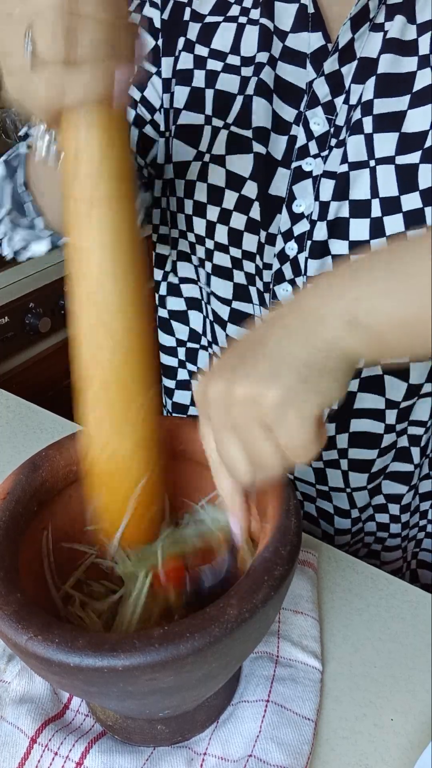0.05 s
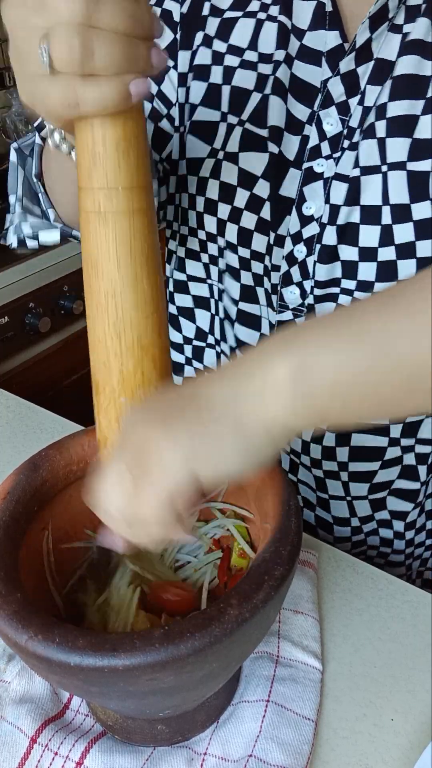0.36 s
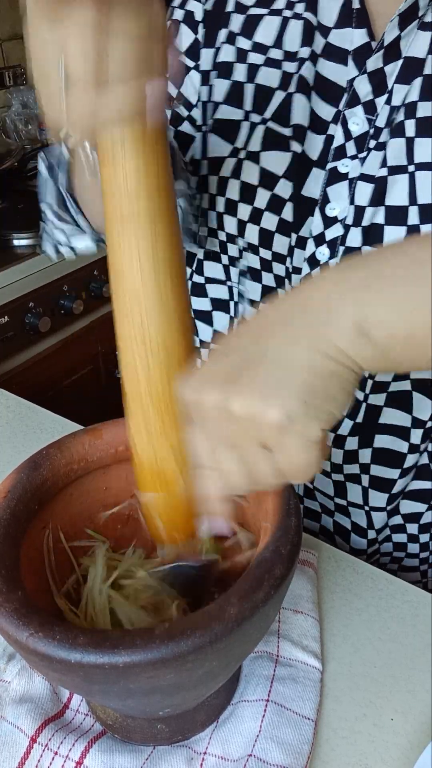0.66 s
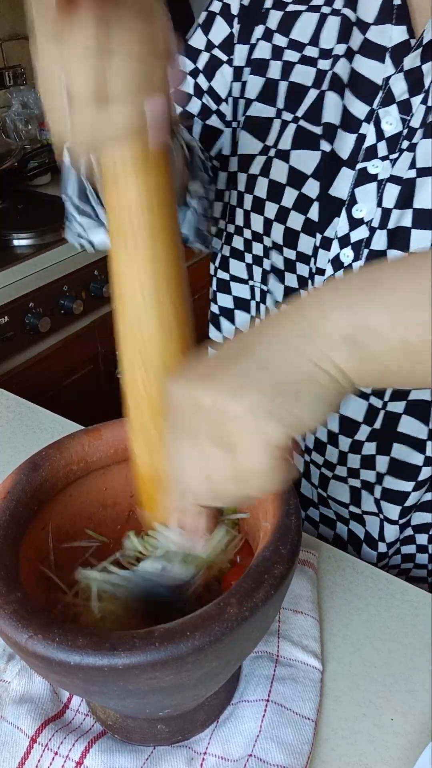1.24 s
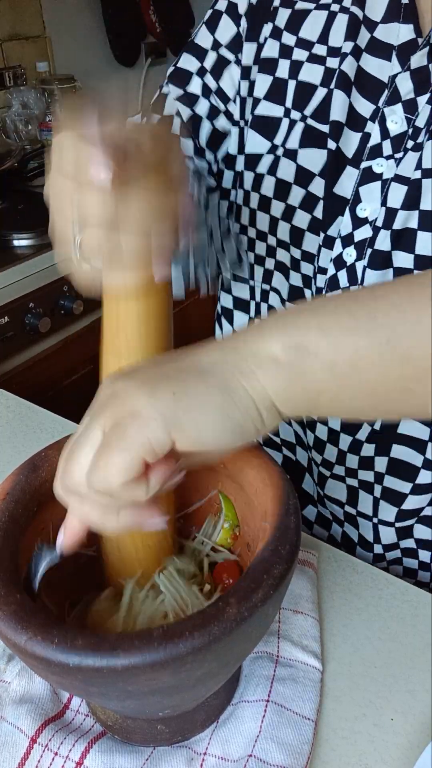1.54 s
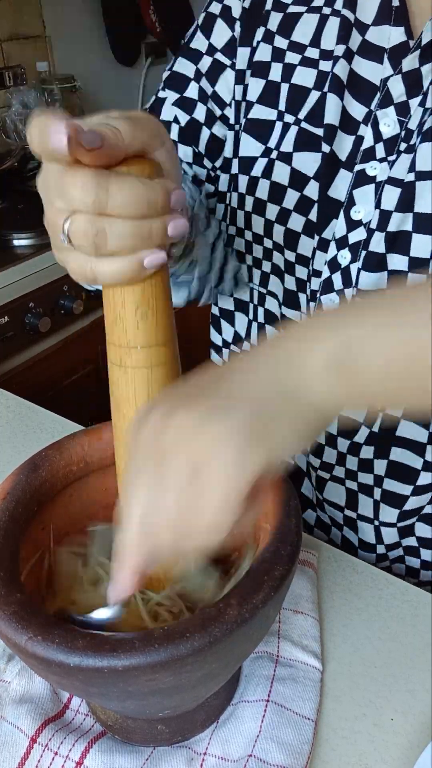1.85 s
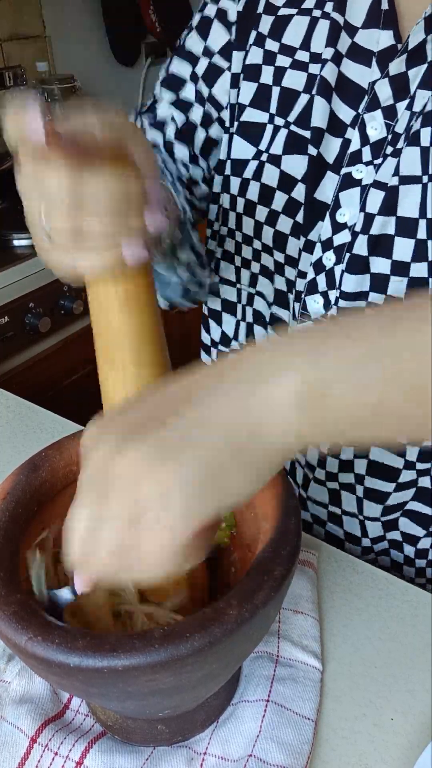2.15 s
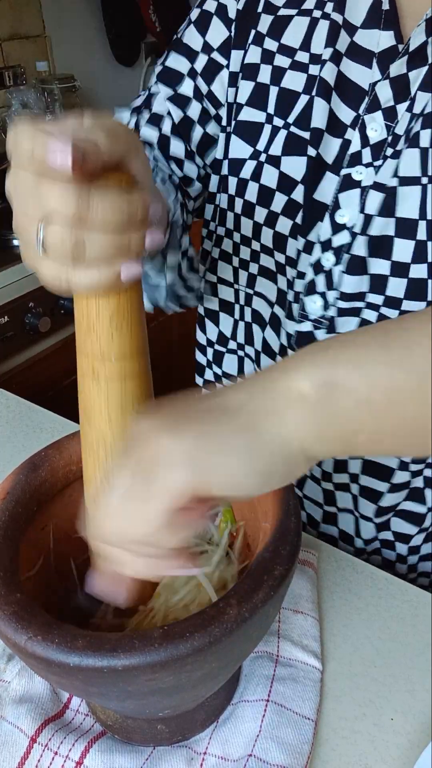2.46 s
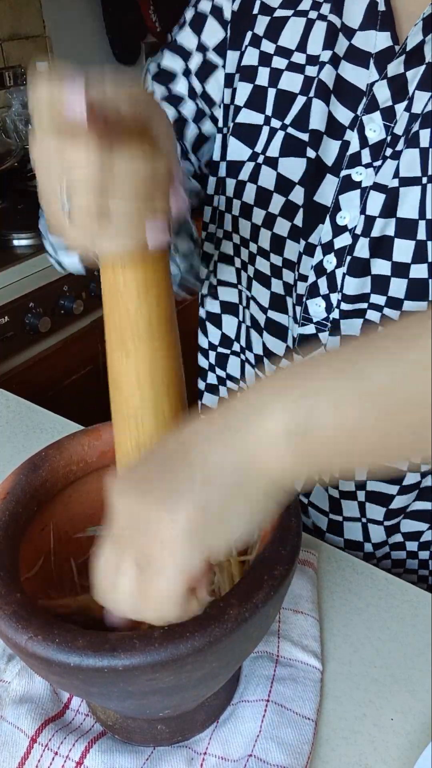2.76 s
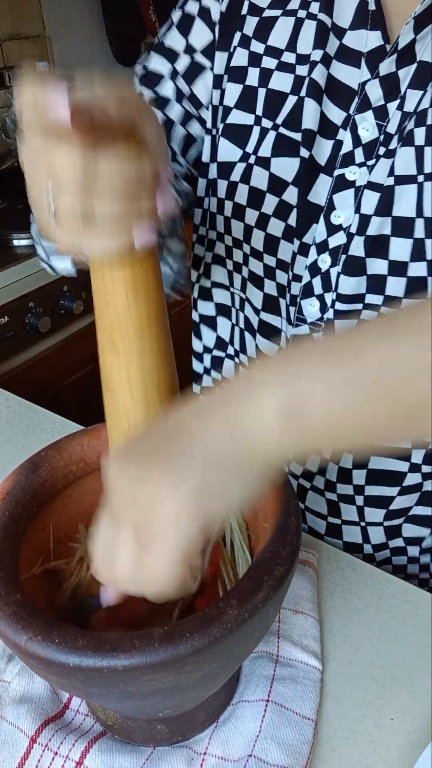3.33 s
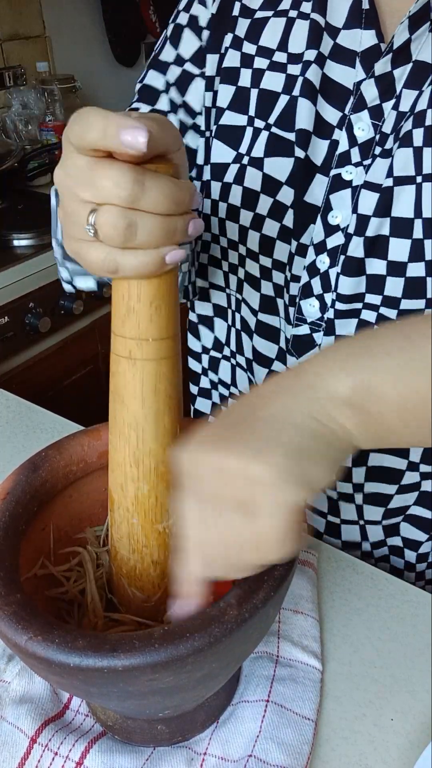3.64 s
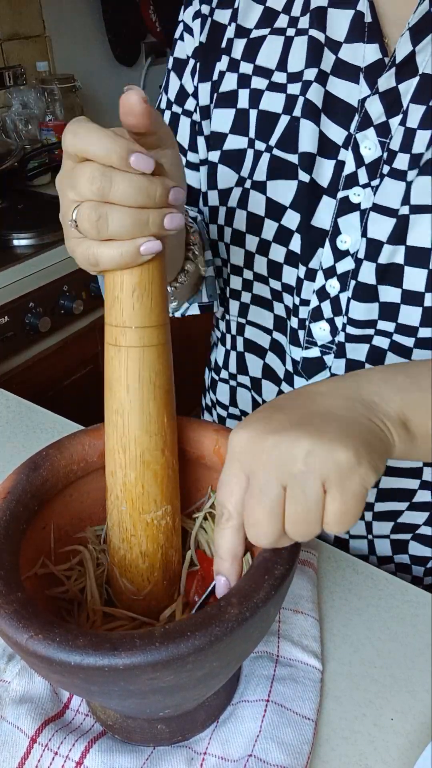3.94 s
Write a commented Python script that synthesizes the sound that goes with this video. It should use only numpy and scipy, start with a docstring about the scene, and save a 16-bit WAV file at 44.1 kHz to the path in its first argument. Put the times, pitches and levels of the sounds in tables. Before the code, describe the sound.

Close up in a small kitchen, a pestle knocks rhythmically in a clay mortar, thumping the table and squishing wet food. A metal spoon ticks and scrapes between the strokes, until the work stops near the end.

```python
"""Pestle and clay mortar

Close up in a small kitchen, on a stereo pair of microphones. A wooden pestle pounds shredded vegetables
about 3.5 times a second; each blow knocks and rings the clay, thumps the table and squeezes the wet food.
Between blows a metal spoon clinks on the wall and scrapes the food back with short squeaks."""
import sys
import numpy as np
from scipy import signal
from scipy.fft import rfft, irfft
from scipy.io import wavfile
from scipy.ndimage import uniform_filter1d, map_coordinates

SR = 44100
rng = np.random.default_rng(int(sys.argv[2]) if len(sys.argv) > 2 else 0)


def persist_wave(psi):
    """Save psi, clipped to +-1, as 16-bit WAV."""
    counts = np.round(np.clip(psi, -1, 1) * 32767).astype(np.int16)
    wavfile.write(sys.argv[1], SR, np.atleast_2d(counts).T)


N = 176400
T = np.arange(SR // 2) / SR  # time axis of one short sound
WORK_ENDS_S, CHATTER_S, POPS_PER_S = 3.58, 0.005, 2100
CLACK_DECAY_S, CLACK_SNAP = 0.0046, 11.9


def amp(db):
    """Decibels to gain."""
    return 10 ** (np.asarray(db) / 20)


def unit(x):
    """Scales to an rms of 1."""
    return x / np.sqrt(np.mean(x ** 2) + 1e-20)


def hit_unit(x):
    """Scales so that the first 10 ms have an rms of 1."""
    return x / np.sqrt(np.mean(x[..., :SR // 100] ** 2) + 1e-20)


def read(points, hz):
    """Reads a table on a log-frequency axis."""
    freqs, values = np.transpose(points)
    return np.interp(np.log(hz + 1), np.log(freqs), values)


def add(mix, start_s, sound):
    """Mixes a sound in at start_s."""
    at = round(start_s * SR)
    sound = sound[..., max(-at, 0):]
    part = mix[..., max(at, 0):][..., :sound.shape[-1]]
    part += sound[..., :part.shape[-1]]


def colour(x, spectrum, tilt_db=0):
    """Causal filter with the given spectrum, tilted by tilt_db per octave from 300 to 4000 Hz."""
    hz = abs(np.fft.fftfreq(2048, 1 / SR))
    octaves = np.log2(np.clip(hz, 300, 4000) / 1000)
    log_gain = np.log(amp(read(spectrum, hz) + tilt_db * octaves))
    minimum_phase = np.exp(np.conj(signal.hilbert(log_gain)))
    return signal.fftconvolve(x, np.fft.ifft(minimum_phase).real)[:len(x)]


def band(x, lo_hz, hi_hz):
    """Band-pass filter."""
    return signal.sosfilt(signal.butter(2, [lo_hz, hi_hz], "band", fs=SR, output="sos"), x)


def mode(hz, db, t60, phase=0):
    """One dying sine."""
    return amp(db - 60 * T / t60) * np.sin(2 * np.pi * hz * T + phase)


def burst(decay_s, snap):
    """A sharp contact followed by its dense scatter inside the bowl."""
    x = rng.standard_normal(len(T)) * np.exp(-T / decay_s)
    x[0] += snap
    return x


def grains(size, per_s):
    """Random clicks of uneven strength."""
    signs = rng.choice([-1, 1], size)
    strength_db = 3 * np.minimum(rng.exponential(1, size), 5)
    return unit(signs * amp(strength_db) * (rng.random(size) < per_s / SR))


def drift(size, over_s):
    """A random wander with an rms of 1, changing over about over_s."""
    width = round(over_s * SR)
    smooth = uniform_filter1d(rng.standard_normal(size), width, mode="wrap")
    return unit(uniform_filter1d(smooth, width // 2 + 1, mode="wrap"))


def scatter(x):
    """The curved bowl sends a different cluster of quick reflections to each microphone."""
    reflections = rng.standard_normal((2, len(T))) * np.exp(-T / 0.0028)
    paths = amp(2.5) * unit(reflections) / np.sqrt(len(T))
    paths[:, 0] += 1
    return signal.fftconvolve(x[None], paths, axes=1)[:, :len(x)]


# The small kitchen's reverberation: freq_hz, t60_s
KITCHEN_DECAY = [(60, 0.54), (200, 0.32), (600, 0.17), (1200, 0.47), (3200, 0.27), (8000, 0.3),
                 (15000, 0.26)]
# Surfaces near the mortar: delay_s, left_gain, right_gain
NEAR_ECHOES = [(.0031, 0.48, 0.1), (.0074, 0.13, 0.2), (0.0132, 0.14, 0.2)]
def room(x, wet_db, echo_db, correlation=0, left_lag_s=0.00088):
    """Direct sound reaches the right microphone first; near echoes and a diffuse tail follow."""
    hz, t, noise = signal.stft(rng.standard_normal((2, len(T))), SR, nperseg=256)
    decay = amp(-60 * t / read(KITCHEN_DECAY, hz)[:, None])
    tail = signal.istft(noise * decay, SR, nperseg=256)[1][:, :len(T)]
    tail *= np.minimum(T / 0.0067, 1)
    tail[1] = correlation * tail[0] + np.sqrt(1 - correlation ** 2) * tail[1]
    response = amp(wet_db) * tail / np.linalg.norm(tail[0])
    response[0, round(left_lag_s * SR)] += 1
    response[1, 0] += 1
    for delay_s, left, right in NEAR_ECHOES:
        response[:, round(delay_s * SR)] += amp(echo_db) * np.array([left, right])
    return signal.fftconvolve(np.atleast_2d(x), response, axes=1)[:, :N]


# The still kitchen all around: freq_hz, level_db
ROOM_TONE_SPECTRUM = [(20, 4.5), (50, -7.5), (400, -25.5), (11000, -32.5)]
def room_tone():
    """Faint, low noise, different at each microphone."""
    return amp(-67.5) * np.array([unit(colour(x, ROOM_TONE_SPECTRUM)) for x in rng.standard_normal((2, N))])


# The rocking table, alike in both microphones: freq_hz, level_db
RUMBLE_SPECTRUM = [(22, -45), (45, -1), (60, 2), (110, -11), (180, -24), (500, -57.5)]
def table_rumble():
    """The table rocks with a low rumble as long as the work lasts, then settles."""
    after_s = np.maximum(np.arange(N) / SR - WORK_ENDS_S, 0)
    return amp(-44 - 87 * after_s) * unit(colour(rng.standard_normal(N), RUMBLE_SPECTRUM))


# Food squeezed or let go by the pestle, down in the bowl: peak_s, level_db, half_width_s
SQUELCHES = [(0.813, -25.5, 0.024), (0.936, -23.5, 0.048), (1.169, -24, 0.008), (1.201, -24.5, 0.023),
             (1.453, -31, 0.012), (1.745, -27.5, 0.019), (1.969, -24, .008), (1.996, -20, 0.018),
             (2.582, -33.5, 0.036), (2.858, -16.5, 0.015), (3.156, -25.5, 0.023), (3.409, -20.5, 0.0093),
             (3.657, -42.5, 0.064)]
# Wet crackle at close range: freq_hz, level_db
WET_SPECTRUM = [(200, -15), (600, -6), (1200, 1.5), (2000, -5.5), (3200, 2), (4200, -1.5), (7000, -2.5),
                (10000, 4), (12500, -14.5), (16000, -16.5)]
def wet_food():
    """Wet shreds crackle faintly all through the work, and in clumps under the pestle."""
    t = np.arange(N) / SR
    mush = amp(-36.5) * (t < WORK_ENDS_S)
    clumps = sum(amp(db) * np.exp(-((t - peak_s) / width_s) ** 2) for peak_s, db, width_s in SQUELCHES)
    crackle = amp(-4) * unit(scatter(colour(grains(N, POPS_PER_S), WET_SPECTRUM)))
    return room((mush + clumps) * crackle, wet_db=-15, echo_db=-10)


# Pestle on clay, close: start_s, clack_db, tilt_db_per_octave, ring_db, ring_t60_s, pitch_hz
KNOCKS = [(0.0163, -14, -2, -11.5, 0.29, 1199), (0.219, -26.5, 5, -34, 0.057, 1255),
          (.282, -13.5, -5, -9.5, 0.14, 1187), (0.562, -20, -3, -5.5, 0.12, 1226),
          (.815, -12, 3.5, -8.5, 0.19, 1214), (1.106, -18, 0, -8, 0.13, 1221),
          (1.337, -27, 11.5, -24, 0.097, 1185), (1.352, -24.5, -5.5, -19, 0.11, 1221),
          (1.6723, -18.5, -3.5, -4.5, 0.16, 1227), (1.925, -16, -1, -7, 0.2, 1219),
          (2.201, -17, 2, -7.5, 0.05, 1224), (2.288, -13.5, 5.5, -15, 0.36, 1218),
          (2.53, -18, -2.5, -9, 0.13, 1223), (2.757, -21, -4.5, -6.5, 0.04, 1163),
          (2.784, -20.5, -6.5, -15.5, 0.12, 1194), (3.085, -15, 1.5, -9, 0.14, 1213),
          (3.305, -15, -4, -13, 0.19, 1215), (3.373, -17.5, -4.5, -12, 0.29, 1205)]
# The mortar's wall: pitch_hz, level_db, t60_s
CLAY_MODES = [(587.4, -8.5, 0.044), (772, -18, 0.11), (931, -27, 0.21), (1083, -12, 0.06),
              (1442, -19.5, 0.062)]
# Wood meeting clay: freq_hz, level_db
CLACK_SPECTRUM = [(150, -14), (300, -7.5), (500, -7.5), (800, 2.5), (1150, -3.5), (1450, -4.5), (2000, -9),
                  (3000, -50), (15000, -37.5)]
def pestle(split_hz=7.2, right_phase_rad=1.33):
    """A clack and a gritty crunch; the clay rings on a close pair of modes until the food damps it."""
    clacks, rings = np.zeros(N), np.zeros((2, N))
    clack_rise, ring_rise = 1 - np.exp(-T / 0.00063), 1 - np.exp(-T / 0.0029)
    choke_db = -4.5 * (1 - np.exp(-(T / 0.033) ** 4))  # the pestle sinks into the food
    for start_s, clack_db, tilt_db, ring_db, t60, hz in KNOCKS:
        clack = amp(1.5) * hit_unit(colour(burst(CLACK_DECAY_S, CLACK_SNAP), CLACK_SPECTRUM, tilt_db))
        wall = amp(11) * sum(mode(wall_hz * (1 + 0.025 * rng.standard_normal()), db, wall_t60)
                             for wall_hz, db, wall_t60 in CLAY_MODES)
        grit = unit(band(grains(len(T), POPS_PER_S), 1400, 3240))
        crunch = amp(tilt_db - 11.5) * grit * np.exp(-T / 0.0086)
        add(clacks, start_s, amp(clack_db) * (clack + wall + crunch) * clack_rise)
        upper = mode(hz, ring_db, t60, phase=np.array([[0], [right_phase_rad]]))
        lower = amp([[3], [-3]]) * mode(hz - split_hz, ring_db - 2.5, t60)  # leans left
        rough_db = 1.5 * drift(len(T), CHATTER_S)
        add(rings, start_s, (upper + lower) * ring_rise * amp(choke_db + rough_db))
    add(clacks, start_s=2.2875, sound=rim_strike())
    return room(clacks, wet_db=-8, echo_db=-8) + room(rings, wet_db=-8, echo_db=-23.5)


# The weight of the blows reaching the table: peak_s, level_db, pitch_hz
THUDS = [(0.022, -13, 126), (.288, -12, 125), (0.313, -22, 136), (.338, -17, 99), (0.365, -19.5, 114),
         (.568, -16.5, 130), (0.843, -12, 143), (.864, -17, 155), (0.894, -13.5, 99.4), (1.137, -14.5, 126),
         (1.199, -21.5, 76.3), (1.406, -18, 113), (1.453, -16.5, 98.5), (1.489, -21, 65.6),
         (1.677, -19.5, 125), (1.959, -13.5, 133.6), (1.975, -20, 100), (2.229, -16.5, 144),
         (2.294, -13.5, 139), (2.535, -17, 127), (2.788, -16.5, 126), (2.834, -21, 75.5), (3.091, -16, 131),
         (3.121, -19.5, 115), (3.31, -21.5, 138), (3.378, -17, 129), (3.407, -16.5, 103.5),
         (3.843, -44, 169.7)]
# The table right under the mortar: pitch_hz, level_db, t60_s
TABLE_MODES = [(44, -41, .45), (61.6, -27.5, .3), (90, -16, 0.083), (122.9, -17, 0.24), (166.6, -14, 0.15),
               (215.5, -7, 0.1), (316, -31, .15)]
def table_thuds(push_cycles=0.39, skew_rad=0.59, bass_cut_hz=48.5):
    """Each blow crushes the food with a dull puff, pushes the table down and leaves it booming."""
    pushes, crush, t = np.zeros(N), np.zeros(N), T - 0.03
    for peak_s, db, hz in THUDS:
        push = np.exp(-(t * hz / push_cycles) ** 2) * np.cos(2 * np.pi * hz * t + skew_rad)
        add(pushes, peak_s + t[0], amp(db) * push)
        puff = hit_unit(colour(burst(decay_s=0.0096, snap=0), CLACK_SPECTRUM, tilt_db=-10.5))
        add(crush, peak_s - 0.5 / hz, amp(db - 14) * puff)
    boom = amp(-34.5) * signal.fftconvolve(pushes, sum(mode(*m) for m in TABLE_MODES))[:N]
    bass_cut = signal.butter(2, bass_cut_hz, "high", fs=SR, output="sos")
    return room(signal.sosfilt(bass_cut, pushes + boom + crush), wet_db=-6.5, echo_db=-25, correlation=0.81)


# The spoon against the bowl wall: pitch_hz, level_db, t60_s
SPOON_MODES = [(2410, -12, 0.11), (3078, 0, 0.067), (3230, -3.5, 0.091), (3306, 2, 0.071),
               (4512, -3.5, 0.076), (5364, -2, .07), (7200, -0.5, .07), (8330, 6, 0.064),
               (10625, 2.5, 0.13), (11950, -6, 0.095), (12800, -11, 0.092), (14600, -19.5, .08)]
def spoon_ring(low_db, stretch, wander_hz):
    """The modes shift with the place of contact and reach each microphone in their own phase."""
    shifts = rng.standard_normal((len(SPOON_MODES), 2))
    phases = rng.uniform(0, 2 * np.pi, (len(SPOON_MODES), 2, 1))
    return sum(mode(hz + wander_hz * detune, db + 2 * boost + low_db * (hz < 5000), t60 * stretch, phase)
               for (hz, db, t60), (detune, boost), phase in zip(SPOON_MODES, shifts, phases))


# Spoon taps on the wall, close: start_s, level_db, low_modes_db, mean_t60_s
CLINKS = [(.097, -15, -2, 0.08), (0.22, -25.5, 21, 0.026), (0.317, -20, -10, 0.06), (0.634, -16, -36, .045),
          (0.889, -24.5, -1, .03), (1.246, -21.5, 7, 0.09), (1.336, -28, -3, 0.028),
          (1.464, -17.5, -0.5, 0.055), (1.763, -18.5, 2, 0.05), (2.03, -15.5, -6, 0.07),
          (2.323, -20, -22, .07), (2.606, -15, -2.5, 0.055), (2.922, -14, 19, .05),
          (3.181, -16.5, -3.5, .04), (3.43, -17.5, -14, .04), (3.76, -52, 8.5, .1)]
# Metal meeting clay: freq_hz, level_db
TICK_SPECTRUM = [(300, -34.5), (1200, -6.5), (2200, -9.5), (3200, 2), (5000, -0.5), (8200, 3.5),
                 (11000, -1.5), (13000, -11), (16000, -25)]
def spoon_clinks():
    """The spoon's edge ticks on the clay; both ring briefly."""
    out = np.zeros((2, N))
    usual_t60 = np.mean([t60 for _, _, t60 in SPOON_MODES])
    clay = amp(-9) * sum(mode(*m) for m in CLAY_MODES[1:])
    for start_s, db, low_db, t60 in CLINKS:
        tick = amp(-0.5) * hit_unit(scatter(colour(burst(decay_s=0.023, snap=1.4), TICK_SPECTRUM)))
        ring = amp(2.5) * hit_unit(spoon_ring(low_db, stretch=t60 / usual_t60, wander_hz=55))
        add(out, start_s, amp(db) * (tick + ring + clay))
    return room(out, wet_db=-11.5, echo_db=-11.5)


# The spoon dragged through the bowl: peak_s, level_db, swell_s, release_s
SCRAPES = [(.135, -25.5, 0.061, 0.039), (0.456, -13.5, 0.075, 0.053), (0.682, -24.5, .02, 0.085),
           (0.746, -19.5, 0.04, 0.042), (1.019, -11, 0.042, 0.03), (1.556, -9.5, .026, 0.034),
           (1.632, -20.5, 0.035, 0.011), (1.788, -26.5, .02, 0.049), (1.848, -23.5, .01, 0.032),
           (2.112, -21.5, 0.03, 0.095), (2.163, -21, .02, 0.0089), (2.389, -16.5, 0.03, 0.071),
           (2.658, -25, .03, 0.055), (2.906, -16, .025, 0.02), (2.955, -15.5, .04, 0.037),
           (3.232, -21.5, 0.027, 0.047), (3.53, -19, 0.06, 0.051), (3.83, -45, .025, 0.022)]
# Steel on rough clay at close range: freq_hz, level_db
GRIT_SPECTRUM = [(200, -6), (500, -20.5), (900, -10.5), (1220, 1), (1600, -12), (2400, -6.5), (3200, -13.5),
                 (3900, -2), (4600, 0), (8000, 1.5), (10800, -3.5), (13200, -18.5), (16000, -24)]
def spoon_scrapes(sizzle_lead_s=0.012):
    """Wet shreds sizzle ahead of the spoon; tiny slips over rough clay hiss and ring the steel."""
    out, t = np.zeros((2, N)), np.arange(-SR // 3, SR // 3) / SR
    for peak_s, db, swell_s, release_s in SCRAPES:
        pressure = np.exp(-np.where(t < 0, (t / swell_s) ** 2, abs(t / release_s) ** 1.66))
        strength = amp(db) * np.sqrt(np.mean(pressure ** 2))
        slips = grains(len(t), per_s=5000) * pressure * amp(1.36 * drift(len(t), CHATTER_S))
        steel = spoon_ring(low_db=5, stretch=0.5, wander_hz=60)
        ring = signal.fftconvolve(slips[None], steel, axes=1)[:, :len(t)]
        travel = np.cumsum(1 + 0.01 * drift(len(t), over_s=0.02975))  # pitches slide as the spoon moves
        ring = np.array([map_coordinates(side, [travel], order=3) for side in ring])
        hiss = amp(-4.5) * unit(scatter(colour(slips, GRIT_SPECTRUM)))
        sizzle = amp(-10.5) * unit(scatter(band(slips, 9540, 12430)))
        add(out, peak_s + t[0], strength * (hiss + amp(-4) * unit(ring)))
        add(out, peak_s + t[0] - sizzle_lead_s, strength * sizzle)
    return room(out, wet_db=-10.5, echo_db=-16.5)


# The spoon sticking on the bowl wall: peak_s, level_db, pitch_hz, half_width_s
SQUEAKS = [(0.414, -20.5, 4590, 0.019), (.463, -20, 3290, 0.014), (0.493, -22.5, 3130, 0.031),
           (0.972, -21.5, 4650, .022), (1.022, -16.5, 3260, 0.023), (1.537, -20, 4510, 0.013),
           (1.554, -21, 3320, 0.0075), (1.584, -17, 3070, 0.017), (1.627, -26, 3063, 0.019),
           (2.43, -26.5, 3303, 0.047), (2.907, -28, 4610, 0.02), (2.955, -20.5, 3288, 0.031),
           (3.537, -30.5, 3370, 0.02)]
def spoon_squeaks(sag_hz_per_s=960, jitter_hz=79.8, rough_db=3.5, grain_s=0.002):
    """Under pressure the slips lock onto one resonance of the spoon: a short, rough, sagging tone."""
    out, t = np.zeros(N), T - T.mean()
    for peak_s, db, hz, width_s in SQUEAKS:
        pitch = hz - sag_hz_per_s * t + jitter_hz * drift(len(t), grain_s)
        tone = np.sin(2 * np.pi * np.cumsum(pitch) / SR) * amp(rough_db * drift(len(t), grain_s))
        add(out, peak_s + t[0], amp(db) * unit(tone) * np.exp(-(t / width_s) ** 2))
    return room(out, wet_db=-7, echo_db=-20.5)


def rim_strike():
    """A bare blow on the rim cracks sharply and rings higher than the bowl."""
    crack = amp(-20) * hit_unit(band(burst(CLACK_DECAY_S, CLACK_SNAP), 1400, 4400))
    return crack + mode(hz=1450, db=-6.5, t60=0.073)


def scene():
    """The work at the table over the quiet of the kitchen."""
    return (room_tone() + pestle() + table_thuds() + table_rumble()
            + spoon_clinks() + spoon_scrapes() + spoon_squeaks() + wet_food())


# The difference in colour between the microphones: freq_hz, left_minus_right_db
MIC_BALANCE = [(30, 2), (100, 1), (250, 4.5), (500, -8), (800, -2), (1200, -1), (5000, 0.5), (8000, 2.5),
               (13000, -9.5)]
def record(dry):
    """Two microphones of slightly different colour, overload at full scale, then the band limit."""
    lean_db = read(MIC_BALANCE, np.fft.rfftfreq(2 * N, 1 / SR)) / 2
    heard = irfft(rfft(dry, 2 * N) * amp([lean_db, -lean_db]))[:, :N]
    low_pass = signal.firwin(401, 16200, window=("kaiser", 8), fs=SR)
    return signal.oaconvolve(np.clip(heard, -1, 1), low_pass[None], "same")


dry = scene()
out = record(dry)
persist_wave(out)
```